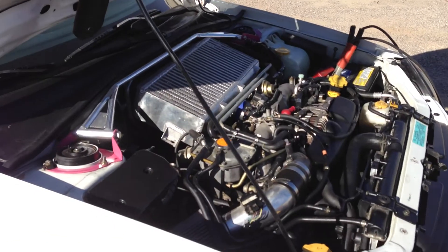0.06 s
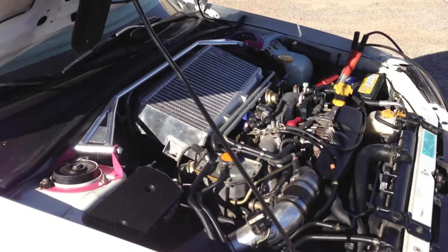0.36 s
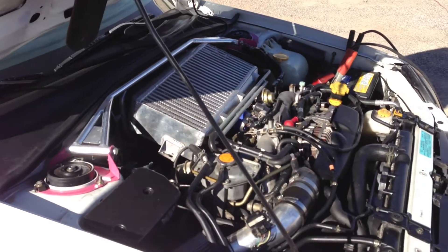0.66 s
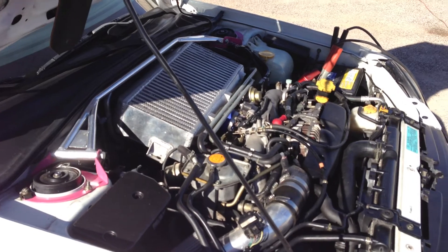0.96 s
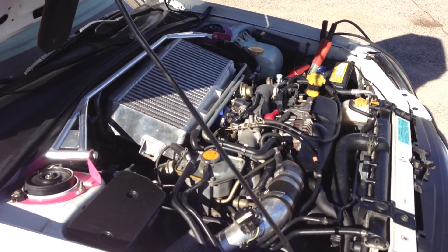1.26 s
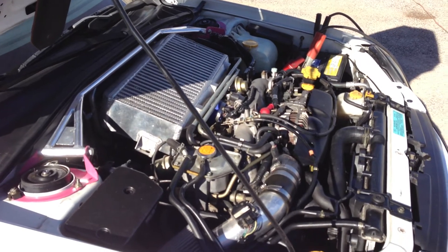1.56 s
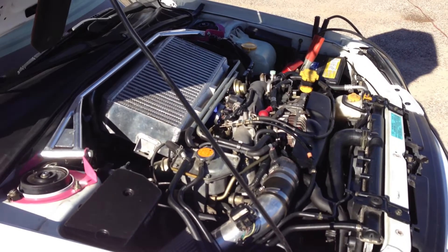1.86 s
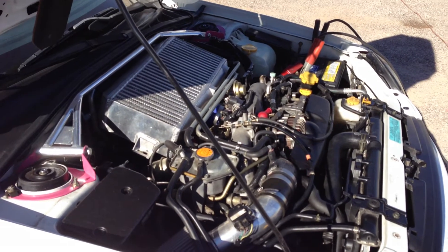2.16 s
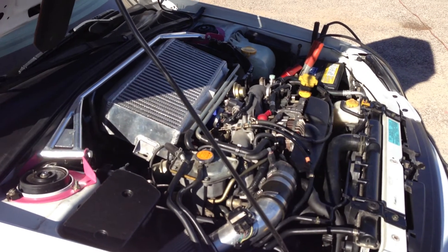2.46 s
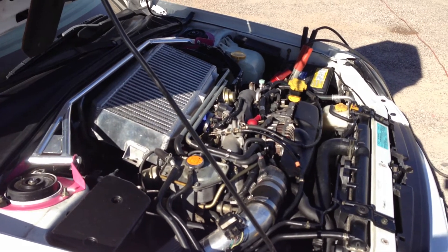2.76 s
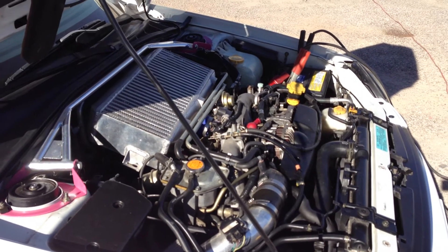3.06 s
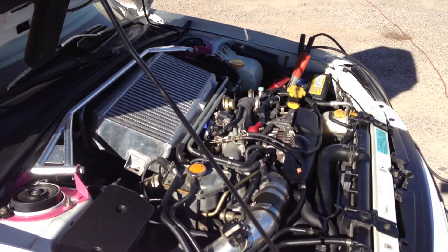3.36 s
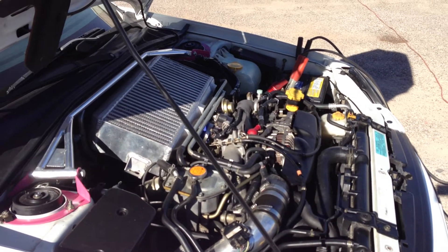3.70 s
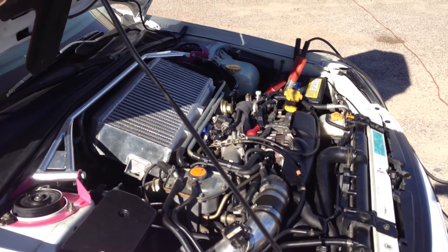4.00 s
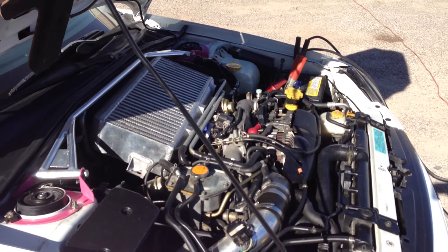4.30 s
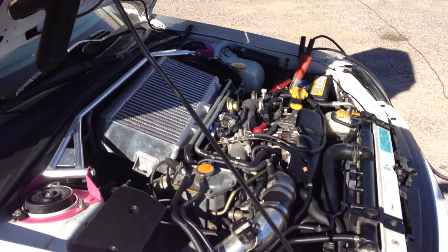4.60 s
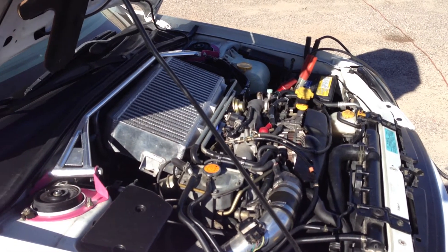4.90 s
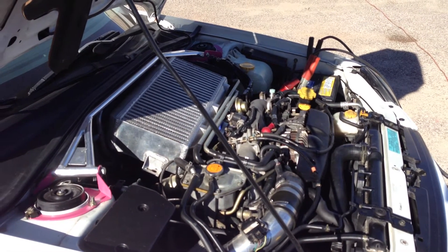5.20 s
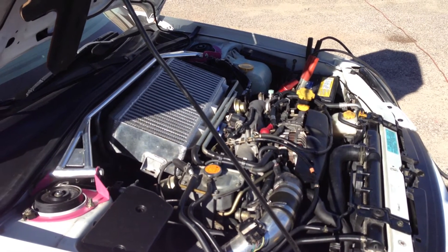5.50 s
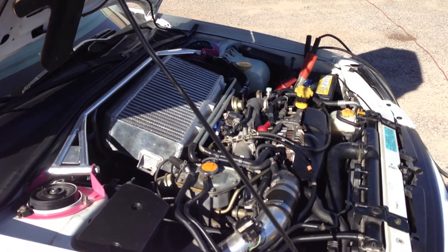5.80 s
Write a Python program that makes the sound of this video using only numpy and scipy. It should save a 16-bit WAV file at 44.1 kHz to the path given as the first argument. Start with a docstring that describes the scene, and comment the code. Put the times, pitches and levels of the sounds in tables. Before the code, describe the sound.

From the start, a worn car engine runs at a fast idle outdoors, heard close from above the open hood. A sharp, bright metallic tick repeats evenly about ten times a second, each followed by a heavier, hollow knock, making a steady clatter. Underneath are a low throb and the whirr of belts and fan. A tiny squeaky chirp comes with each tick, swelling and fading over the first two and a half seconds, then turning lower and fainter. The knocks are sometimes dull early on and become harder after about 1.3 seconds. At about 4.5 seconds the engine is switched off: the throb and chirps vanish, a few weaker clacks slow down, and it settles with a small shudder by 4.8 seconds. A very quiet outdoor background remains, with two faint scuffs around 6 seconds.

```python
"""A chirp, a sharp tick and a heavier knock repeat over the throb of a worn four-cylinder car engine.
Fast idle, outdoors, heard from above the open hood. Once per four-stroke cycle a contact rubs and a
loose part strikes; the firings set the pipes and bay booming; belts and fan whirr.
Switched off, the engine clacks as it slows, shudders to rest and leaves a quiet outdoor background."""
import sys
import numpy as np
from scipy import signal
from scipy.fft import rfft, irfft, next_fast_len
from scipy.io import wavfile

SR = 44100
rng = np.random.default_rng(int(sys.argv[2]) if len(sys.argv) > 2 else 0)


def dump_mix(stems):
    """Bounce the given channels to the path in sys.argv[1] as a 16-bit WAV at rate SR."""
    frames = np.atleast_2d(stems).T  # one column per channel
    limited = np.clip(frames, -1, 1)  # hard clip at full scale
    pcm = np.round(limited * 32767).astype(np.int16)
    wavfile.write(sys.argv[1], SR, pcm)


N = 266760
TIME = np.arange(N) / SR
AGE = np.arange(SR // 4) / SR  # s since a blow
IDLE_RPM, SWITCH_OFF_S = 1170, 4.45
SCATTER_DB, SCATTER_DB_OCT = 0.36, 1  # blow to blow: strength, brightness

# engine speed, idle then run-down: time_s, speed_rpm
SPEED = [(0.0, 1103.4), (0.3, 1071.1), (0.7, 1135.8), (1.5, 1157.8), (1.8, 1158.7), (2.2, 1170.6),
         (3.45, 1189.0), (4.27, 1170.8), (4.43, 1196.7), (4.53, 878.6), (4.68, 488.0), (4.78, 0.0)]
# firing strength: time_s, level_db
THROB = [(0, -32), (.45, -34), (1.1, -28), (1.4, -31), (2.6, -32.5), (4.4, -31.5)]


def ticks(block, gain_db, block_db, tilt_db_oct, slow_db, slow_db_oct):
    """Light, bright blow of the loose part, once a cycle; slow_* apply per halving of speed."""
    # tick strength at idle: time_s, level_db
    strength = [(.05, -14), (.5, -18), (.85, -15.5), (1.13, -15.5), (1.35, -18), (2.8, -18), (3.3, -18),
                (3.9, -18.5), (4.4, -16.5)]
    # tick spectrum: freq_hz, level_db
    colour = [(80, -55.5), (300, -9.5), (900, -7), (1500, -4.5), (2300, -2.5), (2900, -7.5), (3600, 4.5),
              (5000, 2), (6500, -2), (8100, 2), (9200, -8), (12000, -8), (15200, -19)]
    times = cycle_times(0)
    chance = rng.standard_normal((len(times), 2))
    levels_db = curve(strength, times) + slow_db * halvings(times) + SCATTER_DB * chance[:, 0]
    tilts = tilt_db_oct + slow_db_oct * halvings(times) + SCATTER_DB_OCT * chance[:, 1]
    shape = blow_shape(attack_s=.0002, crack_t60_s=.051, tail_db=-4, tail_t60_s=.061,
                       echo_s=.006, echo_db=-13.5, snap_db=-7)
    rings = dense_modes(colour, times, fresh=.23, count=6)
    track = np.zeros(N)
    for s, db, tilt, modes in zip(times, levels_db, tilts, rings):
        tick = shape * tilted(modes, tilt, pivot_hz=5500) + amp(block_db) * block
        add(track, s - .0002, amp(db + gain_db) * unit_onset(tick, samples=660))
    return track


def knocks(block, lag_cycles, crack_db, clonk_db, block_db, hollow_db, hard_db_oct, soft_db_oct):
    """Heavy blow: a crack, then a hollow clonk of block and bay; both weaken as the engine slows."""
    # softness of the landing, 0 = hard crack, 1 = dull clonk: time_s, softness
    cushion = [(.08, .55), (.19, 1), (.41, .95), (.62, .2), (.85, .38), (1.15, 0.95), (1.27, .2),
               (2.1, .15), (3.1, .04), (4.43, 0.01)]
    # crack spectrum: freq_hz, level_db
    crack_colour = [(100, -72), (500, -23.5), (1500, -21.5), (3000, -12.5), (4200, 0), (5000, -3),
                    (6000, 3), (7000, -1.5), (8200, -2), (9200, -8), (11300, -9.5), (13000, -13.5),
                    (15200, -23.5)]
    # clonk spectrum: freq_hz, level_db
    clonk_colour = [(80, -68), (200, -3.5), (450, -10), (620, -12), (900, 3), (1130, -1.5), (1600, 2.5),
                    (2200, 2.5), (2800, -1.5), (4000, -2.5), (8000, -18), (15000, -32.5)]
    times = cycle_times(lag_cycles)
    crack_shape = blow_shape(attack_s=.0004, crack_t60_s=.041, tail_db=-4.5, tail_t60_s=.083,
                             echo_s=.005, echo_db=-6.5, snap_db=0)
    cracks = dense_modes(crack_colour, times, fresh=.15, count=6)
    clonks = rise(.0026) * fade(.089) * dense_modes(clonk_colour, times, fresh=.58)
    track = np.zeros(N)
    for s, soft, slow, crack, clonk in zip(times, curve(cushion, times), halvings(times), cracks, clonks):
        firing_db = curve(THROB, s) + 32  # above usual strength; strong firings knock harder
        force = amp(.35 * firing_db + SCATTER_DB * rng.standard_normal())
        tilt = hard_db_oct + soft_db_oct * soft + SCATTER_DB_OCT * rng.standard_normal()
        crack = unit_onset(crack_shape * tilted(crack, tilt, pivot_hz=4995), samples=660)
        # a soft landing thins the crack and feeds the clonk
        clonk = unit_onset(clonk + amp(block_db + 4.5 * soft) * block, samples=1100)
        add(track, s - .0004 - .0015 * soft, force * amp(crack_db - 10.5 * soft - 3.5 * slow) * crack)
        add(track, s, force * amp(clonk_db + 5.5 * soft - 8 * slow) * clonk)
        add(track, s, force * amp(hollow_db - 2 * soft - 8 * slow) * bay_hollow())
    return track


def block_ring():
    """Damped sines of the struck block and covers."""
    # block modes: freq_hz, level_db, t60_s
    modes = [(575.4, 2.5, 0.2), (860, -2.5, 0.14), (1310, 1, 0.079), (1604, 5, 0.11), (1980, -9, 0.27),
             (2266, 3.5, 0.17), (2300, -10.5, 0.12), (2790, 12, 0.0678), (3590, 10.5, .11),
             (4220, 6.5, .11), (5300, -2.5, .09), (6040, -0.5, 0.15), (7900, -18.5, 0.051)]
    ring = sum(amp(db) * fade(t60_s) * np.sin(2 * np.pi * hz * AGE + rng.uniform(0, 2 * np.pi))
               for hz, db, t60_s in modes)
    return ring * rise(.000675)


def bay_hollow():
    """Air in the bay swells after a knock, at new strengths each time."""
    # air resonances: freq_hz, level_db, peak_s, half_length_s
    resonances = [(1418, -9.5, 0.007, 0.0096), (1050, -4.5, 0.012, 0.0037), (895, -4, 0.0056, 0.0092),
                  (720.7, .5, 0.02, 0.0072), (616.5, -5.5, 0.0048, 0.0067), (589.5, -3, 0.026, 0.004)]
    swells = sum(amp(db + 2 * rng.standard_normal()) * np.exp(-((AGE - peak_s) / half_s) ** 2)
                 * np.sin(2 * np.pi * hz * AGE) for hz, db, peak_s, half_s in resonances)
    return swells * rise(.0013)


def chirps(gain_db, lead_s, peak_s, slack_hz, glide_s, overtone_db, scrape_db, bay_db, echo_s, echo_db):
    """Before each tick a rubbing contact squeaks up from its slack pitch; it dies with the ignition."""
    # squeak strength: time_s, level_db
    strength = [(.04, -22.5), (.25, -17.5), (.48, -25), (.78, -14.5), (1.01, -26.5), (1.11, -26),
                (1.31, -14.5), (1.43, -21), (1.74, -21), (1.84, -18), (1.95, -23.5), (2.05, -14),
                (2.15, -22), (2.36, -22.5), (2.45, -33), (2.56, -22.5), (2.66, -36), (2.8, -26.5),
                (3.4, -25), (4.1, -27.5), (4.39, -26)]
    # mid-squeak pitch: time_s, pitch_hz
    pitch = [(0, 2247), (2.3, 2316), (2.7, 1813), (3.15, 1596), (4.4, 1616)]
    # flutter and scrape spectra: freq_hz, level_db
    flutter_colour = [(400, -4), (900, -42.5), (2000, -90.5)]
    scrape_colour = [(900, -21.5), (1550, -.5), (2000, -3.5), (2550, 8.5), (3000, -16.5), (4000, -9.5),
                     (5000, -7.5), (6000, -18), (15000, -29)]
    swell = (AGE / peak_s * np.exp(1 - AGE / peak_s)) ** 3
    tension = 1.27 * rise(glide_s)
    bay_reverb = unit(rng.standard_normal(len(AGE)) * fade(.1) * (AGE > .004)) / np.sqrt(len(AGE))
    track = np.zeros(N)
    for s in cycle_times(0) - lead_s:
        db = curve(strength, s) + run_down_db(s, db_per_s=-450)
        mid_hz = curve(pitch, s) * (1 + .032 * rng.standard_normal())
        grip, slip = (noise(flutter_colour, len(AGE)) for _ in range(2))
        pitch_hz = (slack_hz + (mid_hz - slack_hz) * tension) * (1 + .039 * slip)
        phase = 2 * np.pi * np.cumsum(pitch_hz) / SR
        tone = (1 + .36 * grip) * (np.sin(phase) + amp(overtone_db) * np.sin(2 * phase))
        # a light touch scrapes more than it sings
        scrape = amp(scrape_db - .32 * (db + 13)) * noise(scrape_colour, len(AGE))
        squeak = swell * (tone + scrape)
        squeak += amp(bay_db) * signal.fftconvolve(squeak, bay_reverb)[:len(AGE)]
        squeak = amp(db + gain_db) * unit_onset(squeak, samples=750)
        add(track, s, squeak)
        add(track, s + echo_s, amp(echo_db) * squeak)  # off the surroundings
    return track


def throb(gain_db, scatter_db, low_cut_hz):
    """Four unequal firings a cycle set the pipes and bay booming; they fade after switch-off."""
    # two strong and two weak firings: after_tick_cycles, level_db
    firings = [(.215, .3), (.412, -7.6), (.735, -15), (.957, .6)]
    # pipe and bay modes: freq_hz, level_db, t60_s
    modes = [(103, -9, .22), (139.6, 5.9, 0.17), (173, 11.5, 0.059), (232, -1, 0.11), (305, 3.5, .09)]
    boom = rise(.003) * sum(amp(db) * fade(t60_s) * np.sin(2 * np.pi * hz * AGE)
                            for hz, db, t60_s in modes)
    low_cut = signal.butter(3, low_cut_hz, 'high', fs=SR, output='sos')  # thins the boom's deep bass
    boom = unit_onset(signal.sosfilt(low_cut, boom), samples=4400)
    track = np.zeros(N)
    for lag_cycles, db in firings:
        for s in cycle_times(lag_cycles):
            strength_db = curve(THROB, s) + run_down_db(s, db_per_s=-190)
            strength_db += scatter_db * rng.standard_normal()
            add(track, s, amp(strength_db + db + gain_db) * boom)
    return track


def whirr(fresh, surge_db, surge_lag_cycles):
    """Belts, gears, fan and intake: a rush that partly repeats and surges after the strong firings."""
    # rush, running down after switch-off: time_s, level_db
    strength = [(0, -28), (1.2, -29.5), (2.2, -31), (3.4, -30.5), (4.44, -30), (4.5, -35.5), (4.58, -39),
                (4.61, -34.5), (4.64, -38.5), (4.68, -47), (4.75, -49), (4.83, -60), (4.95, -64.5)]
    # rush spectrum: freq_hz, level_db
    colour = [(20, -17.5), (50, -12.5), (90, -16.5), (170, 6.5), (400, -6.5), (580, -5.5), (800, -1.5),
              (1150, -5), (1800, 0), (2600, -6.5), (3500, -11), (6000, -17.5), (10000, -25), (15200, -31.5)]
    times = cycle_times(0)
    cycle_s = np.median(np.diff(times))
    window = np.sin(np.pi * np.minimum(AGE / (2 * cycle_s), 1))
    repeating = np.zeros(N)
    for s, grain in zip(times, dense_modes(colour, times, fresh=0)):
        add(repeating, s - .06, window * grain)
    rush = np.sqrt(1 - fresh) * repeating + np.sqrt(fresh) * noise(colour, N)
    surge = amp(surge_db * np.cos(2 * np.pi * (cycles() - surge_lag_cycles)) * (TIME < SWITCH_OFF_S))
    return amp(curve(strength, TIME)) * surge * rush


def surroundings():
    """Outdoor background with a few soft rustles."""
    # background strength: time_s, level_db
    strength = [(0, -42.5), (5.05, -56.5), (5.45, -55.5), (5.65, -55), (6.05, -54.5)]
    # background spectrum: freq_hz, level_db
    colour = [(15, -85.5), (25, -59), (172, -5.5), (197, -4.5), (328, -9.5), (429, -7), (714, -12),
              (774, -7), (909, -16), (986, -10.5), (1980, -21), (2880, -21), (15200, -39)]
    # engine settling on its mounts, then faint scuffs: start_s, level_db, t60_s
    rustles = [(4.763, -47, 0.1), (4.789, -46.5, 0.078), (5.84, -52, 0.22), (6.008, -48.5, 0.28)]
    # rustle spectrum: freq_hz, level_db
    rustle_colour = [(80, -24), (200, 5.5), (900, 0.5), (2000, -6.5), (5000, -16), (15000, -27)]
    track = amp(curve(strength, TIME)) * noise(colour, N)
    for s, db, t60_s in rustles:
        shape = rise(.0053) * fade(t60_s)
        add(track, s, amp(db) * shape / shape.max() * noise(rustle_colour, len(AGE)))
    return track


def dense_modes(colour, times, fresh, count=4):
    """Near-alike ring per blow, drifting as the listener moves; fresh = power share of new noise."""
    views = np.array([noise(colour, len(AGE)) for _ in range(count)])
    position = times[:, None] / times[-1] * (count - 1)
    weights = np.maximum(1 - np.abs(position - np.arange(count)), 0)
    new = np.array([noise(colour, len(AGE)) for _ in times])
    return np.sqrt(1 - fresh) * np.sqrt(weights) @ views + np.sqrt(fresh) * new


def blow_shape(attack_s, crack_t60_s, tail_db, tail_t60_s, echo_s, echo_db, snap_db):
    """Envelope of a blow: contact snap, direct crack, echo off the hood, tail of the bay."""
    snap = amp(snap_db) * fade(.008)
    crack = fade(crack_t60_s)
    echo = amp(echo_db) * np.interp(AGE - echo_s, AGE, crack, left=0)
    tail = amp(tail_db) * fade(tail_t60_s)
    return rise(attack_s) * np.sqrt(snap ** 2 + crack ** 2 + echo ** 2 + tail ** 2)


def cycles(first_tick_cycles=.5039):
    """Four-stroke cycles (two turns each) run so far, whole at every tick."""
    return np.cumsum(curve(SPEED, TIME)) / SR / 120 - first_tick_cycles


def cycle_times(lag_cycles):
    """Times in s at which the engine is lag_cycles past a tick."""
    run = cycles()
    marks = np.arange(-1, run[-1]) + lag_cycles
    return np.interp(marks[(marks > run[0]) & (marks < run[-1])], run, TIME)


def halvings(s):
    """Times the speed has halved from idle."""
    return np.log2(IDLE_RPM / np.maximum(curve(SPEED, s), 1))


def run_down_db(s, db_per_s):
    """Level change since switch-off."""
    return db_per_s * np.maximum(s - SWITCH_OFF_S, 0)


def tilted(x, db_oct, pivot_hz):
    """Tilt the spectrum, from an octave below the pivot upward."""
    hz = np.fft.rfftfreq(len(x), 1 / SR)
    return irfft(rfft(x) * amp(db_oct * np.log2(np.maximum(hz / pivot_hz, .5))), len(x))


def noise(colour, samples):
    """Noise of rms 1 shaped by (freq_hz, level_db) points."""
    hz, db = np.transpose(colour)
    gain = amp(np.interp(np.log(np.fft.rfftfreq(samples, 1 / SR) + 1), np.log(hz), db))
    return unit(irfft(rfft(rng.standard_normal(samples)) * gain, samples))


def rise(tau_s):
    """Exponential approach to 1."""
    return 1 - np.exp(-AGE / tau_s)


def fade(t60_s):
    """Free decay."""
    return amp(-60 * AGE / t60_s)


def curve(rows, s):
    """Interpolate (time_s, value) points."""
    return np.interp(s, *np.transpose(rows))


def amp(db):
    """dB to gain."""
    return 10 ** (np.asarray(db) / 20)


def unit(x):
    """Scale to rms 1."""
    return unit_onset(x, len(x))


def unit_onset(x, samples):
    """Scale to rms 1 over the first samples."""
    return x / np.sqrt(np.mean(x[:samples] ** 2) + 1e-20)


def add(track, start_s, sound):
    """Mix a sound into the track."""
    start = max(round(start_s * SR), 0)
    part = track[start:start + len(sound)]
    part += sound[:len(part)]


def scene():
    """Engine and outdoors, mono."""
    block = block_ring()
    mix = ticks(block, gain_db=-.5, block_db=-26.5, tilt_db_oct=.68, slow_db=-8, slow_db_oct=-1.8)
    mix += knocks(block, lag_cycles=.2487, crack_db=-17.5, clonk_db=-24, block_db=-21.5,
                  hollow_db=-27.5, hard_db_oct=-.41, soft_db_oct=7.2)
    mix += chirps(gain_db=.5, lead_s=.0198, peak_s=.0062, slack_hz=1543, glide_s=.0056,
                  overtone_db=-16, scrape_db=-9.5, bay_db=-3, echo_s=.018, echo_db=-10.5)
    mix += throb(gain_db=-5, scatter_db=.1, low_cut_hz=104.76)
    mix += whirr(fresh=.6, surge_db=2.5, surge_lag_cycles=.38)
    mix += surroundings()
    return mix[None]


def record(dry, ceiling=.8, top_hz=15500):
    """Round off the highest peaks, then low-pass steeply."""
    limited = dry / (1 + (dry / ceiling) ** 6) ** (1 / 6)
    size = next_fast_len(N + SR // 4)
    hz = np.fft.rfftfreq(size, 1 / SR)
    return irfft(rfft(limited, size) / (1 + (hz / top_hz) ** 120), size)[:, :N]


dry = scene()
out = record(dry)
dump_mix(out)
```